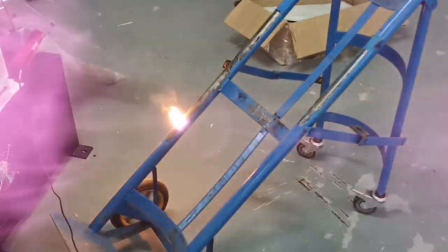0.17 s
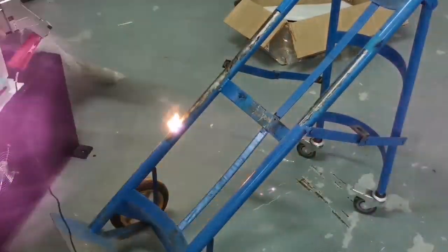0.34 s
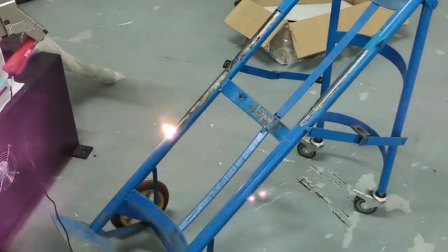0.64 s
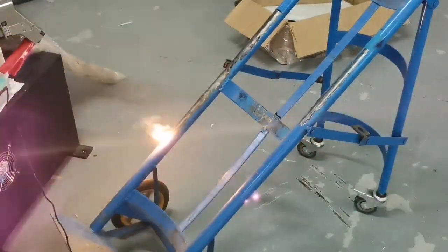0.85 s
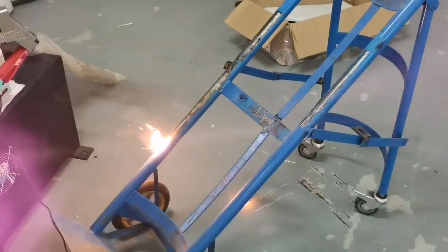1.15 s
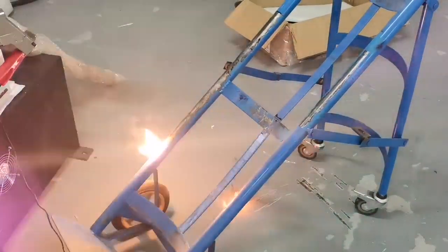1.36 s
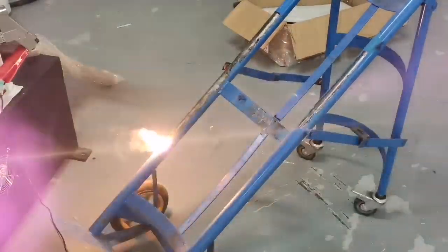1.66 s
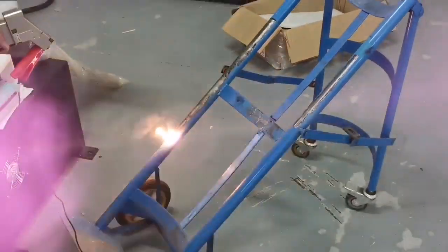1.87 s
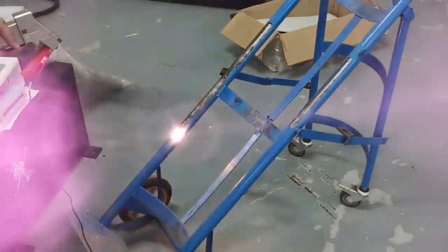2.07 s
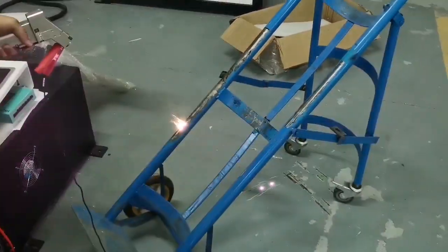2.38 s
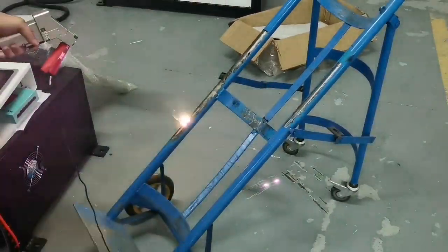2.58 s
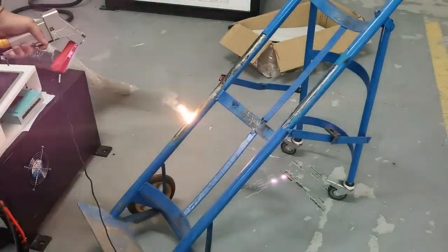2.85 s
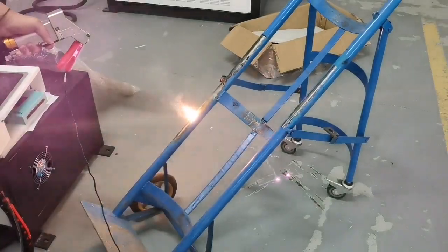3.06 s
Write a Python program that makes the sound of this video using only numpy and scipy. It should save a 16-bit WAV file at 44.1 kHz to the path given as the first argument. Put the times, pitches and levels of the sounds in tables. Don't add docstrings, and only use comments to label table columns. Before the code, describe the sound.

Close stereo pickup of a continuous bright air hiss and uneven electrical buzz burning paint off steel. Background rumble is quickly suppressed, leaving faint fan hum; halfway through, the hiss shifts in tone between the sides.

```python
import sys
import numpy as np
from scipy import signal
from scipy.io import wavfile
from scipy.ndimage import uniform_filter1d

SR = 44100
rng = np.random.default_rng(int(sys.argv[2]) if len(sys.argv) > 2 else 0)


def pcm_store(signal):
    levels = np.round(np.clip(np.atleast_2d(signal), -1, 1) * 32767)
    wavfile.write(sys.argv[1], SR, levels.astype(np.int16).T)


def level_to_linear(level):
    exponent = np.asarray(level, float) / 20
    return 10 ** exponent


N = 142002

# pitch_hz, level_before_turn_db, level_after_turn_db
LEFT_HISS_LOW = [(1820, -104, -82), (2610, -69, -73), (3220, -74, -64.5), (4060, -45, -58.5),
                 (4260, -60, -49), (5230, -49, -64), (5270, -62.5, -66)]
LEFT_HISS_HIGH = [(7200, -59.5, -68), (8530, -59.5, -61.5), (8780, -51.5, -60), (9270, -55, -57.5),
                  (9770, -65, -68.5), (11500, -76.5, -78.5), (13100, -80, -92), (15800, -83, -75)]
RIGHT_HISS_LOW = [(1870, -114, -82), (2315, -68, -76.5), (2680, -58, -59.5), (3515, -46.5, -48.5),
                  (4230, -41.5, -42.5), (4856, -43, -47), (5185, -55.5, -51)]
RIGHT_HISS_HIGH = [(6680, -64.5, -54.5), (7100, -81, -66.5), (8000, -88, -86), (9100, -80.5, -75),
                   (10740, -67, -68), (13700, -74.5, -77), (15200, -85, -85), (16000, -92, -85)]
# time_s, turn_share (0-1), jet_level_db
CAMERA_TURN = [
    (0, 0.42, 0.5),
    (.4, 0.1, 0.5),
    (.9, 0.11, 0),
    (1.42, 0.47, 1.8),
    (1.52, 0.7, 0.5),
    (1.9, 0.86, 0.5),
    (2.4, 0.94, 1),
    (2.8, 0.82, 1.3),
    (3.22, 0.75, 0.8),
]
# pitch_hz, alike_share (0-1)
JET_ALIKE = [(1800, .4), (2700, .7), (3500, .92), (4600, .8), (6000, .8), (8000, .65), (12000, .45),
             (15600, .4)]
# pitch_hz, lead_radians
JET_LEAD = [(2760, .4), (3200, -3.6), (4480, -2.6), (4900, -.4), (6200, 2.8), (7900, 8.2), (10000, 8.8),
            (15200, 16)]
# time_s, strength_db, brightness_db (per harmonic), tube_ring_db (4th harmonic),
# lopsided_sweep_db (odd harmonics)
BEAM_CHANGES = [(0, -47.5, -1.7, -8, 0), (.12, -57.5, -4.5, 11, -3), (.48, -53, 0, -3, -5.5),
                (.7, -53.5, 1.5, -6, -14), (.88, -61, 0.5, 5, -6), (.94, -54, 0.6, -9, 6.5),
                (1.15, -54.5, -1, -1, -4), (1.3, -47, -.5, -6, -14.5), (1.47, -56.5, -3, -5, 0.5),
                (1.55, -52, 1.4, 3, -2), (1.8, -54, .5, -4, 4), (2.3, -59, -0.7, 6.5, -3.5),
                (2.52, -53, 1.5, -6, -3.5), (2.7, -59, 3, 7, 4.5), (2.76, -58, 0.5, 13, 10),
                (2.95, -60.5, 1.5, 7, 4), (3.08, -58, .2, 9.5, 7), (3.22, -54, 3, 6, 4)]
# multiple (of the sweep rate), left_db, right_db
BUZZ_HARMONICS = [(1, -3.5, -8), (2, 1, -9), (3, -5.5, 1.5), (4, 5, -4.5), (5, -2, -4), (6, -1, 13.5),
                  (7, 4.5, 8), (8, 14, 2), (9, 2, 13)]
# pitch_hz, level_db (per Hz)
RUMBLE_LEVEL = [(25, -16), (60, -10), (110, -14.5), (240, -5.5), (620, -11.5), (1000, -7.5), (1400, -11.5),
                (2300, -5.5)]
# pitch_hz, alike_share (0-1)
RUMBLE_ALIKE = [(30, .72), (80, .86), (200, .88), (400, .75), (800, .45), (1500, .15), (2300, .15)]
# pitch_hz, cut_db
SUPPRESSOR_CUT = [(30, 3.5), (80, 15.5), (150, 13.5), (400, 6.5), (1000, 7), (1600, 1.5), (2300, 3.5)]
# pitch_hz, level_db (rms), waver_hz
FAN_HUMS = [(147, -53.5, 8.7), (174.3, -69, 4.2), (303, -70.5, 9.6), (342, -65, 7.6)]


def read(points, hz, column=1):
    table = np.array(points, float)
    return np.interp(np.log(hz + 1), np.log(table[:, 0] + 1), table[:, column])


def evened(x):
    return x / np.sqrt(np.mean(abs(x) ** 2) + 1e-20)


def frame_grid():
    return np.fft.rfftfreq(1024, 1 / SR), np.arange(N // 256 + 5) * 256 / SR


def smooth_patches(field, bins, frames):
    over_pitch = uniform_filter1d(field, size=bins, axis=1)
    return evened(uniform_filter1d(over_pitch, size=frames, axis=2))


def noise_pair(gain_db, same, phase):
    a, b, c, d = rng.standard_normal((gain_db.shape[2], gain_db.shape[1], 4)).T
    same = np.clip(same, 0, 1)[:, None]
    left = a + 1j * b
    shared = same * left * np.exp(-1j * phase)[:, None]
    right = shared + np.sqrt(1 - same ** 2) * (c + 1j * d)
    spectra = np.array([left, right]) * level_to_linear(gain_db)
    return signal.istft(spectra, nperseg=1024, noverlap=768)[1][:, :N]


def wander(rate_hz, count):
    steps = rng.standard_normal((N // 64 + 2, count, 2)) @ [1, 1j]
    shape = np.exp(-.5 * (np.fft.fftfreq(len(steps), 64 / SR) / rate_hz) ** 2)
    slow = np.fft.ifft(np.fft.fft(steps, axis=0) * shape[:, None], axis=0).T
    slow = slow / np.sqrt(np.mean(shape ** 2) * 2)
    return np.array([np.interp(np.arange(N) / 64, np.arange(len(row)), row) for row in slow])


def jet():
    patch_db, ripple_db, flicker_db = 0.7, 0.68, -0.15
    hz, t = frame_grid()
    s, turn, jet_db = np.transpose(CAMERA_TURN)
    turn = np.clip(np.interp(t, s, turn), 0, 1)
    ports = []
    for port in (LEFT_HISS_LOW + LEFT_HISS_HIGH, RIGHT_HISS_LOW + RIGHT_HISS_HIGH):
        before = np.outer(read(port, hz), 1 - turn)
        after = np.outer(read(port, hz, column=2), turn)
        ports.append(before + after)
    field = rng.standard_normal((len(t), len(hz), 2)).T
    patches = smooth_patches(field, bins=12, frames=14)
    ripple = smooth_patches(field[::-1], bins=3, frames=90)
    flicker = evened(uniform_filter1d(rng.standard_normal(len(t)), size=3))
    skirt_db = -40 * np.maximum(np.log2(1800 / (hz + 1)), 0)[:, None]
    level = np.array(ports) + skirt_db + np.interp(t, s, jet_db)
    level = level + patch_db * patches + ripple_db * ripple + flicker_db * flicker
    lead = np.interp(hz, *np.transpose(JET_LEAD))
    return level_to_linear(12.5) * noise_pair(level, read(JET_ALIKE, hz), lead)


def echoes(x):
    echo_db, t60_s, shifts_per_s = -5.5, 0.25, 0.384
    t = np.arange(6000) / SR
    signs = rng.choice([-1., 1.], (2, 2, len(t)))
    hits = rng.random((2, 2, len(t))) < .05
    tails = signs * hits * level_to_linear(-60 * t / t60_s)
    tails = tails / np.linalg.norm(tails, axis=2, keepdims=True)
    swing = 2 * np.pi * shifts_per_s * np.arange(N + len(t)) / SR
    padded = np.concatenate([x[:, -len(t):], x], axis=1)
    wet = np.zeros((2, N))
    for weight, tail in zip((np.cos(swing), np.sin(swing)), tails):
        wet += signal.fftconvolve(padded * weight, tail, axes=1)[:, len(t):len(t) + N]
    return (x + level_to_linear(echo_db) * wet) / np.sqrt(1 + level_to_linear(2 * echo_db))


def beam():
    sweep_hz, drift_turns, drifts_per_s = 398.3, .05, 3.
    fades_per_s, same = 12., .5
    s, *controls = np.transpose(BEAM_CHANGES)
    t = np.arange(N) / SR
    strength_db, bright_db, ring_db, odd_db = (np.interp(t, s, c) for c in controls)
    turns = sweep_hz * t + drift_turns * wander(drifts_per_s, count=1)[0].real
    out = np.zeros((2, N))
    for k, left_db, right_db in BUZZ_HARMONICS:
        a, b = wander(fades_per_s * k / 4, count=2)
        shimmer = np.array([a, same * a + np.sqrt(1 - same ** 2) * b])
        steady = .92 ** max(1, 4 * k - 23)
        fade = steady + np.sqrt(1 - steady ** 2) * shimmer
        tone = np.sqrt(2) * (fade * np.exp(2j * np.pi * (k * turns + rng.random()))).real
        shape_db = bright_db * min(k - 4, 2) + ring_db * (k == 4) + odd_db * (k in (1, 3, 5))
        out += level_to_linear(np.array([[left_db], [right_db]]) + strength_db + shape_db) * tone
    return out


def room():
    learn_start_s, learn_s, sink_db_per_s = 0.15, 0.16, 0.95
    hz, t = frame_grid()
    still_open = 1 - np.clip((t - learn_start_s) / learn_s, 0, 1) ** .5
    skirt_db = -40 * np.maximum(np.log2((hz + 1) / 2300), 0)
    settled = (read(RUMBLE_LEVEL, hz) + skirt_db)[:, None] - sink_db_per_s * (t - 1.8)
    level = settled + np.outer(read(SUPPRESSOR_CUT, hz), still_open)
    rumble = noise_pair(np.array([level, level - .8]), read(RUMBLE_ALIKE, hz), 0 * hz)
    return level_to_linear(-47.5) * rumble / np.std(rumble[:, SR:])


def fan():
    steady = .96
    t = np.arange(N) / SR
    out = np.zeros(N)
    for hz, db, waver_hz in FAN_HUMS:
        waver = steady + np.sqrt(1 - steady ** 2) * wander(waver_hz, count=1)[0]
        out += level_to_linear(db) * np.sqrt(2) * (waver * np.exp(2j * np.pi * hz * t)).real
    return out


def scene():
    return echoes(jet()) + beam() + room() + fan()


def low_pass(x):
    return signal.sosfilt(signal.butter(12, 15800, fs=SR, output="sos"), x)


def record(dry):
    return low_pass(dry)


dry = scene()
out = record(dry)
pcm_store(out)
```